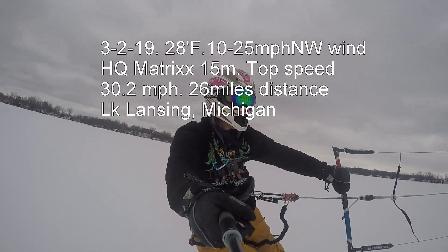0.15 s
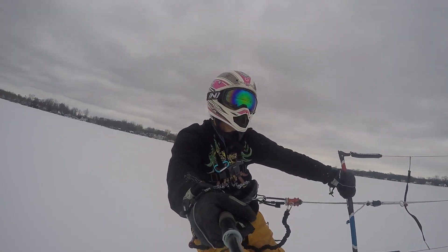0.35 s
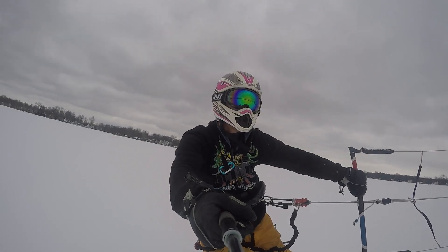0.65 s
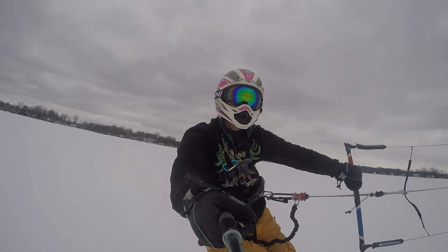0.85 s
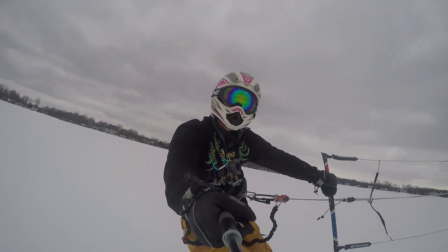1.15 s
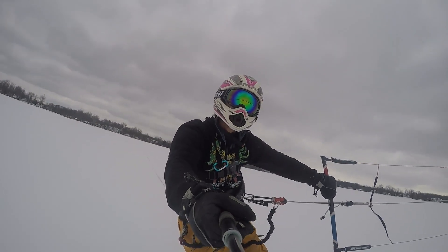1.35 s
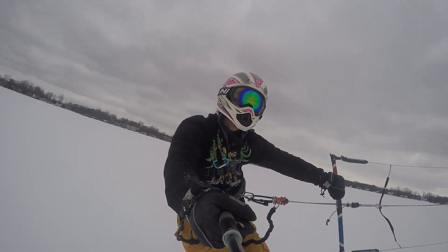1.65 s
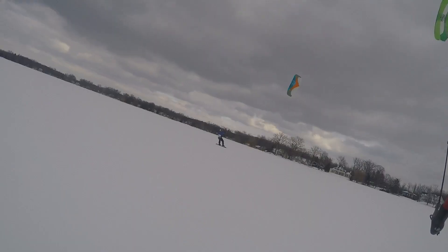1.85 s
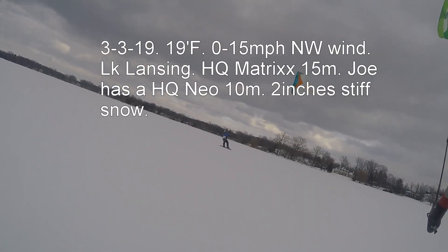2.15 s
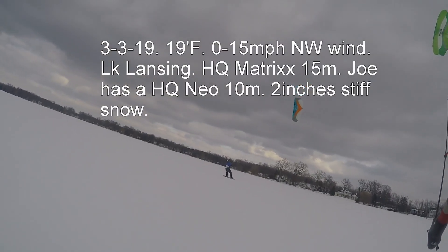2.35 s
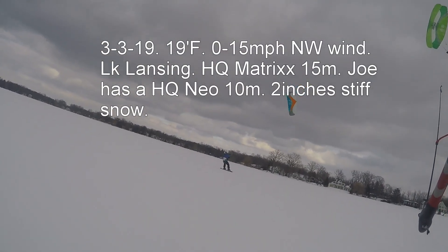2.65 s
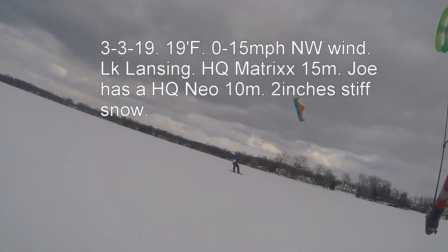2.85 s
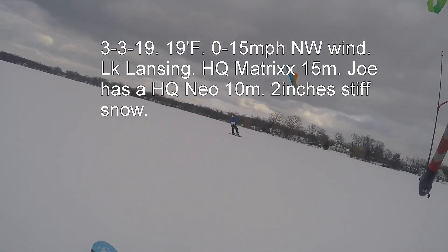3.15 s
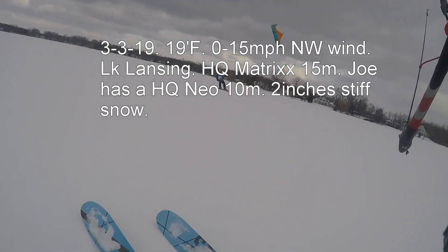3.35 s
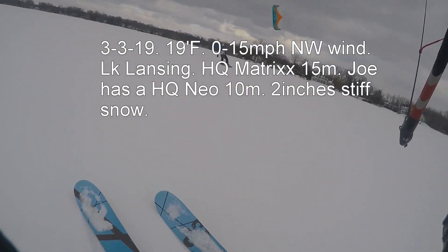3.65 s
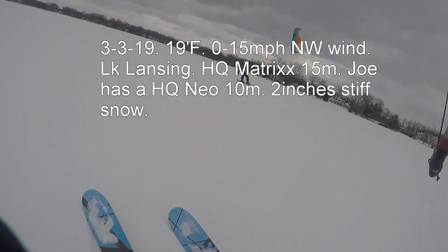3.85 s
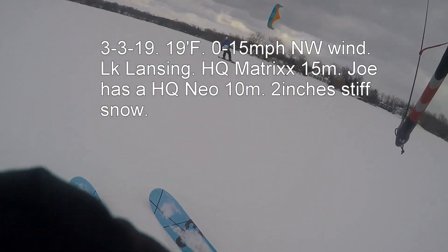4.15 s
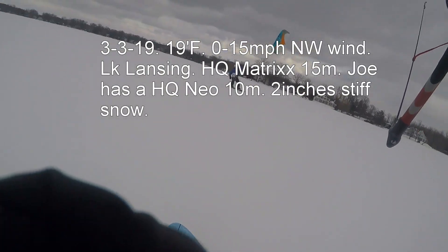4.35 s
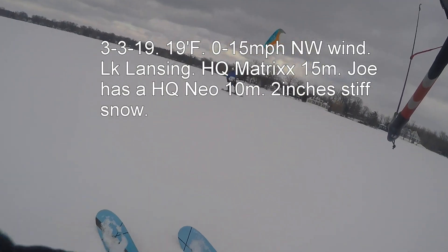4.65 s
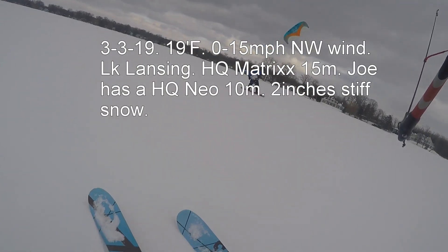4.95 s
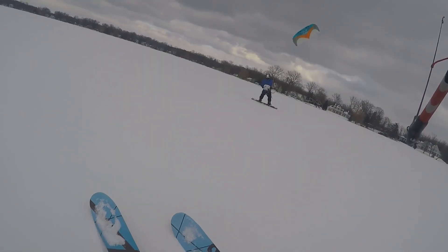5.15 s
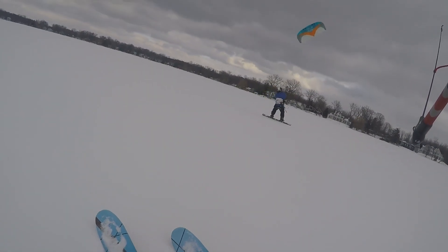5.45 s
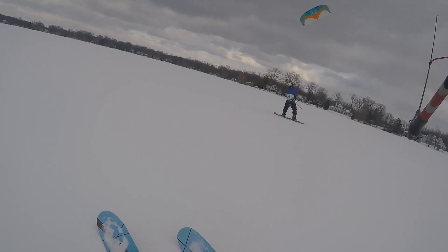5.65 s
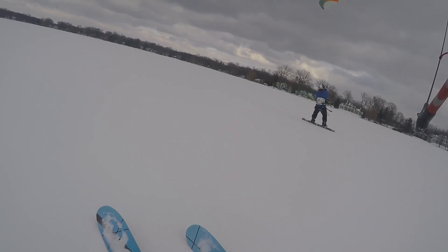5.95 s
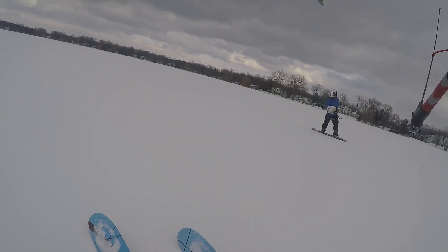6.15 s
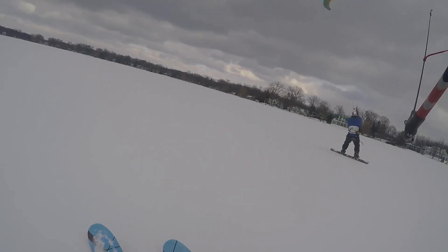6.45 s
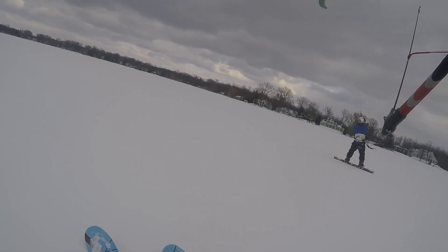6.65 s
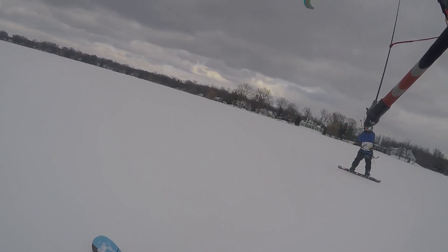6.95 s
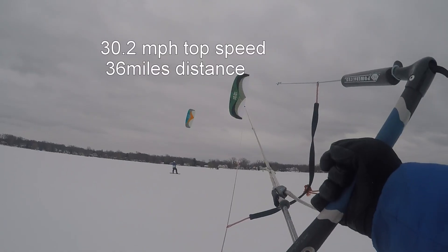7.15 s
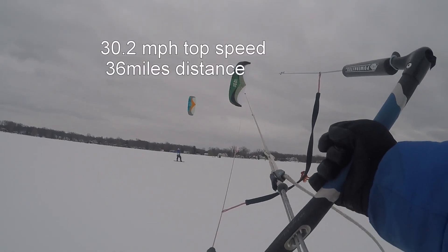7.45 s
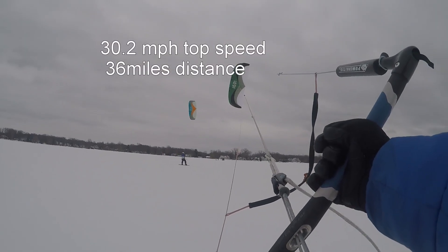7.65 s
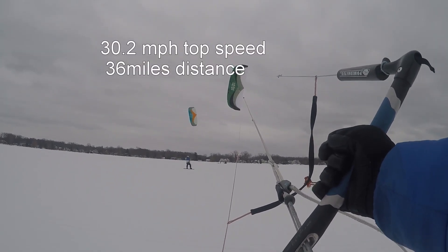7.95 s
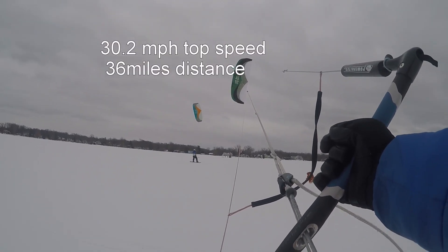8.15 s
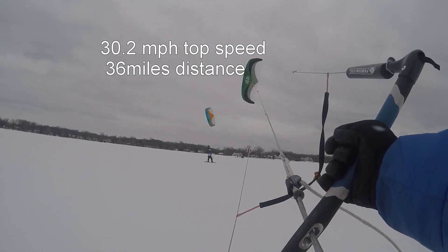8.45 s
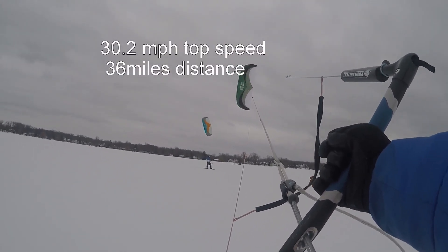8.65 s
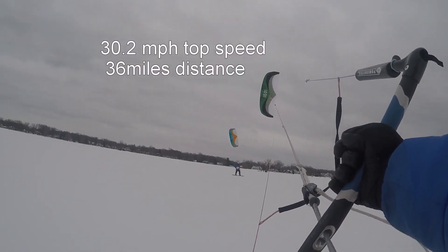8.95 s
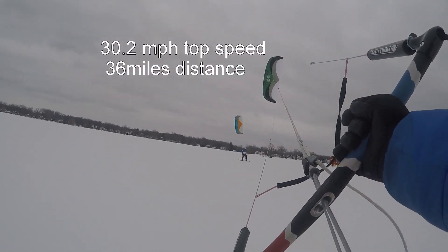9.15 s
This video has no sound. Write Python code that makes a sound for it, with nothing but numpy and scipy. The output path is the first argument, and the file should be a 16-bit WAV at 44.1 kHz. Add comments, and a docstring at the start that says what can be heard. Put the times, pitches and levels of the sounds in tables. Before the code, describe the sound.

Skis hiss faintly over stiff snow while low wind rumbles on a small camera's microphone. A grainy spray of snow, small crunches and a few light clicks fill the first second. At about 1.8 seconds a loud, close knock with a short low shudder breaks in, and the hiss and wind grow stronger. Sharp plastic clicks and dull knocks follow irregularly, loudest until 3.3 seconds, some with a brief metallic ring from a clasp. A quick rattle comes at 2.5 seconds. From about 3.2 to 4.6 seconds a glove rubs the camera in short scrapes among weaker clicks and wind buffets. Then quieter sliding and wind continue, with occasional soft knocks and a sharper one around 6.5 seconds. At about 7 seconds the hiss abruptly turns brighter and steadier, with crunchy swells and two light clicks near 9 seconds, running until about 9.3.

```python
"""On a frozen, snowy lake, a kite pulls a skier along, heard through a small camera's microphone.
The skis hiss and crunch in stiff snow while wind buffets the microphone, in three stretches that
each have their own tone. Early in the middle one, handling adds to the hiss and a glove rubs the
camera. Its plastic housing clicks, rattles and takes dull knocks, and some blows set a metal
clasp on the mount ringing."""
import sys
import numpy as np
from scipy import signal
from scipy.io import wavfile
from scipy.ndimage import uniform_filter1d

SR = 44100
rng = np.random.default_rng(int(sys.argv[2]) if len(sys.argv) > 2 else 0)


def master(y):
    """Save y as 16-bit WAV."""
    cut = np.clip(np.atleast_2d(y).T, -1, 1)
    pcm = np.round(cut * 32767)  # scale
    wavfile.write(sys.argv[1], SR, pcm.astype(np.int16))


N = 410130

# loudness of hiss and wind, one list a stretch: t/s, hiss level/dB, wind level between buffets/dB
STRETCHES = [
    [(0, -49, -41.5), (.2, -53, -51), (.4, -50.5, -44), (.9, -49, -45.5), (1.1, -51, -44.5),
     (1.25, -53.5, -47.5), (1.4, -48.5, -47.5), (1.58, -48.5, -41), (1.68, -54, -51), (1.829, -44, -47)],
    [(1.84, -30, -42), (2.01, -35, -31), (2.09, -37, -32.5), (2.17, -35.5, -37), (2.27, -45, -40.5),
     (2.45, -32, -35), (2.56, -39.5, -36), (2.63, -48.5, -41.5), (2.9, -43.5, -51.5), (3.12, -36.5, -50),
     (3.17, -42.5, -53), (3.3, -35, -32), (3.6, -41.5, -41.5), (3.86, -36, -51), (3.94, -40, -50),
     (4.05, -41, -46), (4.2, -36.5, -42), (4.26, -54, -56), (4.45, -42.5, -35.5), (4.65, -47.5, -48),
     (4.95, -45.5, -47), (5.15, -48.5, -47.5), (5.9, -48, -47.5), (6.4, -44.5, -45.5), (6.86, -41.5, -48),
     (7.07, -42.5, -47)],
    [(7.07, -41.5, -41.5), (7.5, -41, -45.5), (8.2, -40.5, -40), (8.5, -40.5, -42.5), (8.85, -39, -41.5),
     (9.3, -39.5, -41.5)],
]
# tone shared by hiss and wind, one list a stretch: f/Hz, relative level/dB
TONES = [
    [(12, -38), (20, -0.5), (80, -2), (250, -32.5), (372, -32.5), (725, -26.5), (881, -30.5), (985, -31.5),
     (2030, -22.5), (2270, -47), (2470, -19), (3080, -29), (3540, -26.5), (3960, -28.5), (6540, -41),
     (15500, -53)],
    [(12, -29), (20, 4.5), (38, 1.5), (148, -15), (667, -19.5), (1410, -29), (1770, -21), (1980, -26),
     (2840, -17), (3540, -30.5), (4430, -27), (5530, -25.5), (6360, -29), (7520, -41.5), (15500, -50.5)],
    [(12, -44), (20, -19.5), (85, 2), (161, -13.5), (686, -23.5), (788, -20.5), (1340, -27), (1770, -24),
     (2330, -13), (3170, -16), (6190, -33.5), (7310, -32.5), (8170, -32.5), (10200, -40), (15500, -42.5)],
]
# air pockets in the housing that shape that tone, one list a stretch: f/Hz, width/Hz, boost/dB
AIR_POCKETS = [
    [(734, 200, 3.5), (3250, 3500, 0), (6200, 340, -0.5), (6740, 380, 6.5), (7950, 250, 5)],
    [(1800, 280, 3.5), (2800, 860, -1.5), (4200, 320, 3), (5570, 870, -14), (6550, 460, 3),
     (7970, 290, 6.5), (14200, 640, 0.5)],
    [(1807, 200, 13.5), (2500, 1300, -1), (6840, 350, 2), (7320, 420, 8), (10150, 1200, 11.5)],
]
# one row a stretch, with the hiss at its average: fizz level/dB, rumble level/dB
FIZZ_AND_RUMBLE = [(-57, -56), (-51.5, -47.5), (-51, -47.5)]
# the skis break through crust and the hiss swells: fullest t/s, rise/dB, length/s
CRUNCHES = [(0.006, 5, .04), (.3, 4.5, .04), (5.008, 4, 0.07), (5.852, 4, 0.055), (6.06, 2.5, 0.11),
            (7.551, 4.5, .08), (7.86, 2, .05), (8.334, 4.5, 0.15), (8.566, 1.5, 0.049), (8.813, 8, 0.047),
            (8.84, 5, 0.04), (8.881, 5.5, .03), (8.954, 4, .035)]
# ice grains, one value a stretch: level/dB
GRAIN_LEVELS = [-52.5, -58, -66]
# strong jolts of low wind and handling noise: fullest t/s, level/dB, length/s
BUFFETS = [(1.916, -36, 0.091), (2.153, -22.5, 0.079), (2.425, -36, 0.075), (2.932, -29, 0.074),
           (3.094, -35, 0.31), (3.213, -42, 0.063), (3.365, -56, .12), (3.528, -32, 0.073),
           (3.624, -27.5, 0.043), (3.79, -33.5, 0.11), (3.854, -26.5, 0.13), (4.02, -37.5, 0.12),
           (4.46, -40, 0.078), (4.807, -57, 0.1), (5.01, -40.5, 0.073), (5.373, -41, .1),
           (5.891, -40, 0.062), (6.1, -48, 0.11), (6.537, -46, 0.096), (7.453, -37, 0.068),
           (7.953, -50, 0.23), (8.184, -47, 0.13)]
# a spray of snow: t/s, level/dB
SNOW_SPRAY = [(0.141, -52), (.25, -44.5), (.5, -44), (.8, -46.5), (.9, -41.5), (.95, -50), (.98, -52)]
# tones of the housing, one list for each of its four parts: f/Hz, relative level/dB, ring time/s
HOUSING_TONES = [
    [(851, -7.5, 0.031), (1168, 3, 0.021)],
    [(1768, 18.5, 0.032), (2190, 17, 0.019)],
    [(2404, 13.5, 0.019), (2690, 14, 0.021)],
    [(3490, 4.5, 0.025), (3933, 17.5, 0.01), (4540, 6.5, 0.012), (5200, -9, 0.015)],
]
# blows on the housing: t/s, nearest part's peak/dB, place round the parts (0-4), drop per part/dB,
# tick compared with that peak/dB, ring time factor
HOUSING_BLOWS = [(0.706, -36, 2, 9, -3, 0.7), (0.874, -25.5, 3.2, 3.5, 2.5, 0.4),
                 (0.904, -36, 2.5, 15.5, -16.6, 0.75), (0.96, -36, 2.3, 2.5, 1.5, 0.75),
                 (1.067, -42.4, 1.8, 5.0, 6, 0.69), (1.842, 0.5, 0.5, 3.5, -20, 0.82),
                 (1.846, -10, 0.96, 5.5, -19, 0.42), (1.878, -0.6, 3.17, 16, -23, 0.53),
                 (1.943, -23, 2.4, 1, -17, 0.75), (2.042, 0.2, 2.5, 10.5, -12.5, 0.85),
                 (2.049, -13, 1.7, 19, -29, 0.75), (2.112, -23.5, 0.72, 4.0, -15, 0.75),
                 (2.143, -2.5, 2.2, 5.5, -27, 0.33), (2.146, -5.5, 2.34, 10.0, -7, 0.64),
                 (2.154, 1.5, 2.3, 11, -21, 0.88), (2.16, -14, 3.3, 4, -8, 0.6),
                 (2.198, -10, 2.06, 5, -30, 0.56), (2.329, -4.5, 1.46, 8, -12.5, 0.71),
                 (2.385, -17, 0.44, 22, -34, 0.64), (2.435, -14.6, 1.1, 15, -29, 0.75),
                 (2.44, -16, 0.88, 7.0, -24, 0.75), (2.445, -11.5, 1.4, 7, -28, 0.75),
                 (2.469, -11.5, 1.5, 16, -26, 0.68), (2.476, -4, 1.4, 16, -28, 0.65),
                 (2.489, -7, 3, 8.5, -24, 0.46), (2.511, -3.5, 3.1, 21, -24, 0.95),
                 (2.518, -10, 2, 13, -14, 0.53), (2.868, -4, 0.93, 15, -25, 0.6),
                 (2.8685, -4, 2.73, 11, -25, 0.55), (2.926, -23.5, 0.32, 13, -17.2, 0.66),
                 (2.974, -17.5, 3.5, 11, -15, 0.38), (3.0035, 1.5, 0.98, 12.5, -28, 0.61),
                 (3.0037, -7, 2.7, 14, -22, 0.52), (3.095, -16.5, 3.6, 5, -16, 0.89),
                 (3.13, -22.5, 3.3, 7.0, -17, 0.85), (3.148, -24, 1, 1, -16, 0.39),
                 (3.162, -20.5, 2.9, 5.0, -24, 0.68), (3.265, -22.1, 0.28, 13.0, -23, 0.75),
                 (3.315, 0.7, 2.26, 6.5, -3, 0.61), (3.521, -16, 0.1, 11, -25, 0.75),
                 (3.619, -19.5, 1.94, 14, -27, 0.96), (3.643, -19.5, 0.42, 25, -30, 0.22),
                 (3.78, -19.0, 1.7, 11, -15, 0.75), (3.837, -22.5, 1.56, 10.0, -15.6, 0.96),
                 (3.857, -12, 0.76, 13, -24, 0.43), (4.003, -12, 3, 8, 3, 0.42),
                 (4.011, -21.5, 1.6, 6.5, -9, 0.86), (4.052, -25.5, 3.1, 5, -12, 0.54),
                 (4.427, -10.5, 1.1, 5.0, -19.5, 0.49), (4.549, -7.5, 1.47, 12, -16.5, 0.27),
                 (4.559, -22.4, 1.5, 4, -27, 0.8), (4.582, -26, 1.9, 13, -24, 0.68),
                 (4.941, -32.4, 2.4, 13.0, -18, 0.75), (5.251, -36, 2.4, 3, -14, 0.96),
                 (5.881, -27.5, 1.4, 5, -26, 0.47), (6.532, -30, 0.48, 9, -19, 0.84),
                 (6.564, -14.5, 1.24, 7, -34, 0.43), (8.806, -24.5, 1.6, 2.5, -18, 0.75),
                 (8.989, -27.5, 0.76, 6, -27, 0.75)]
# short scrapes, five ski crunches and then glove rubs:
# start t/s, fullest t/s, end t/s, level/dB, treble tilt/dB per octave
SCRAPES = [(.85, .875, .9, -44, 1.5), (.95, .97, .99, -46, 1.5), (1.005, 1.02, 1.045, -46, 1.5),
           (1.06, 1.075, 1.085, -48, 2.5), (1.108, 1.12, 1.15, -46, 1.5), (2.39, 2.41, 2.43, -40, -.6),
           (2.465, 2.515, 2.526, -38, 3), (3.205, 3.24, 3.33, -35, .2), (3.39, 3.42, 3.48, -40, -.6),
           (3.67, 3.71, 3.78, -40, .2), (3.94, 3.99, 4.01, -42, .2), (4.075, 4.165, 4.225, -30, 1.5),
           (4.428, 4.445, 4.55, -35, -4.5), (4.49, 4.545, 4.553, -36, .3)]
# tone of the scrapes: f/Hz, relative level/dB
SCRAPE_TONE = [(180, -26), (300, -15.5), (525, -17), (766, -12), (1140, -34), (1460, 9), (1660, -4.5),
               (3910, -5.5), (4380, -10), (6290, -6.5), (8890, -20.5), (12800, -24), (15300, -29)]
# knocks through the mount: t/s, peak level/dB, f/Hz, ring time/s
MOUNT_KNOCKS = [(1.842, -1, 490, 0.021), (2.125, -18.5, 188, 0.023), (2.383, -23.5, 704, 0.016),
                (2.434, -13.5, 333, 0.022), (2.741, -31.5, 175, 0.027), (2.922, -30, 188, 0.038),
                (3.112, -8.5, 278, 0.012), (3.186, -30, 261, 0.03), (3.249, -49, 404, 0.03),
                (3.312, -18.5, 310, 0.05), (3.512, -8, 270, 0.013), (3.619, -20.5, 670, 0.011),
                (3.765, -25.5, 338, 0.02), (3.839, -34, 183, 0.021), (4.001, -27, 188, 0.018),
                (4.148, -21.5, 750, 0.054), (4.424, -24, 209, 0.0089), (4.999, -24, 620, 0.018),
                (5.368, -26, 493, 0.014), (5.845, -35.5, 216, 0.021), (6.451, -34, 487, 0.023),
                (6.534, -29, 706, 0.045), (6.563, -15, 420, 0.0078)]
# tones of the metal clasp: f/Hz, ring time/s
CLASP_TONES = [(1852, 0.1), (2614, 0.092), (4500, 0.022), (6300, 0.028)]
# blows on the clasp: t/s, nearest tone's peak/dB, place along its tones (0-3)
CLASP_BLOWS = [(1.843, -17, 0.84), (1.88, -13.5, 2.1), (2.043, -15.5, 0.85), (2.155, -16.5, 0.99),
               (2.196, -29, .52), (2.33, -17, 0.15), (2.446, -21.5, 0.31), (2.52, -22, 0.12),
               (2.869, -21, 0.26), (3.005, -14.5, 0.12), (3.316, -22.5, .41)]
# tone of the low shudder: f/Hz, relative level/dB
SHUDDER_TONE = [(35, -53), (60, -19), (110, 0.5), (231, 4), (390, -12.5), (434, -16), (600, -9.5),
                (1500, -21.5), (1950, -50), (3300, -120)]
# how hard a loose part chatters: t/s, level/dB
CHATTER = [(2.425, -60), (2.435, -35), (2.455, -31), (2.465, -55), (2.479, -13), (2.5, -16), (2.517, -8),
           (2.526, -67)]

NOISE_TOP_HZ, MIC_TOP_HZ = 15300, 16400


def gain_of(db):
    """Turns decibels into a number to multiply a sound by."""
    return 10 ** (np.asarray(db) / 20)


def evened(x):
    """Scales a signal to an average strength (rms) of 1."""
    return x / np.sqrt(np.mean(x ** 2) + 1e-20)


def smooth(x, size):
    """Averages twice over size neighbouring samples."""
    return uniform_filter1d(uniform_filter1d(x, size), size)


def add(mix, start, sound):
    """Mixes a sound in, start seconds from the beginning."""
    part = mix[round(start * SR):][:len(sound)]
    part += sound[:len(part)]


def tone_db(table, hz):
    """Reads a tone table's level at any frequency."""
    f, db = np.transpose(table)
    return np.interp(np.log(hz + 1), np.log(f + 1), db)


def wander(t):
    """A random drift of strength about 1, made of slow waves from 1.5 to 14 Hz."""
    coarse = np.arange(t[0], t[-1] + .01, .002)
    hz = np.geomspace(1.5, 14, num=24)[:, None]
    waves = np.sin(2 * np.pi * (hz * coarse + rng.random(hz.shape))) * hz ** -.2
    return np.interp(t, coarse, evened(waves.sum(0)))


def swell(t, fullest, length):
    """A smooth rise from 0 to 1 and back."""
    return np.cos(np.pi * np.clip((t - fullest) / length, -.5, .5)) ** 2


def noise(length, tone, patchy_db, flicker_db, size):
    """Noise of strength 1 in a given tone; patches of it drift and the whole of it flickers."""
    hop = size // 4
    frames, hz = length // hop + 5, np.fft.rfftfreq(size, 1 / SR)
    real, imag, patches = rng.standard_normal((frames, len(hz), 3)).T
    patches = evened(uniform_filter1d(uniform_filter1d(patches, size=5, axis=0), size=9, axis=1))
    flicker = evened(uniform_filter1d(rng.standard_normal(frames), size=3))
    spectra = (real + 1j * imag) * gain_of(tone(hz)[:, None] + patchy_db * patches + flicker_db * flicker)
    return evened(signal.istft(spectra, nperseg=size, noverlap=size - hop)[1][:length])


def band(tone, pockets, low_hz, high_hz):
    """A soft-edged slice of a stretch's tone, shaped by the air pockets."""
    def level_db(hz):
        boost = sum(db / (1 + (2 * (hz - centre) / width) ** 2) for centre, width, db in pockets)
        edges = 10 * np.log10((1 + (low_hz / (hz + 1)) ** 8) * (1 + (hz / high_hz) ** 8))
        return tone_db(tone, hz) + boost - edges - 80 * (hz > NOISE_TOP_HZ)
    return level_db


def ring(tones, detune=1, contact_s=0.0006):
    """A struck object, peak 1: each tone fades by 60 dB over its ring time."""
    t = np.arange(6000) / SR
    sound = sum(gain_of(db - 60 * t / max(ring_s, .004)) * np.sin(2 * np.pi * hz * detune * t)
                for hz, db, ring_s in tones)
    sound *= np.sin(np.pi / 2 * np.minimum(t / contact_s, 1)) ** 2  # the blow takes time to land
    return sound / abs(sound).max()


def ski_and_handling_hiss(t, hiss_db, fizz_db, rumble_db, tone, pockets):
    """Skis on snow, plus handling early in the middle stretch; fizz and rumble partly follow along."""
    hiss_db = hiss_db + 0.88 * wander(t)
    swing_db = hiss_db - hiss_db.mean()
    crunch_db = sum(rise_db * swell(t, fullest, length) for fullest, rise_db, length in CRUNCHES)
    hiss = noise(len(t), band(tone, pockets, 1055, 4140), 1.02, 1.64, size=256)
    fizz = noise(len(t), band(tone, pockets, 4930, 18000), 0.92, 1.0, size=256)
    rumble = noise(len(t), band(tone, pockets, 125, 1360), 1.5, 2.2, size=512)
    return (gain_of(hiss_db + crunch_db) * hiss
            + gain_of(fizz_db + 0.53 * swing_db + crunch_db) * fizz
            + gain_of(rumble_db + 0.93 * swing_db) * rumble)


def ice_grains(length, per_second=40):
    """Scattered ice grains crack under the skis, a few of them large."""
    sizes = gain_of(4.3 * np.minimum(rng.exponential(1, length), 3))
    cracks = sizes * (rng.random(length) < per_second / SR)
    fade = gain_of(-60 * np.arange(600) / SR / 0.011)
    puffs = rng.standard_normal(length) * signal.oaconvolve(cracks, fade)[:length]
    return signal.sosfilt(signal.butter(2, [2200, 9000], "band", fs=SR, output="sos"), puffs)


def wind(t, wind_db, tone, pockets):
    """Air pushes on the microphone: a deep roar with sudden buffets."""
    strength = gain_of(wind_db + wander(t))
    strength += sum(gain_of(db) * swell(t, fullest, length) for fullest, db, length in BUFFETS)
    roar = noise(len(t), band(tone, pockets, 21.6, 202), 0.4, 0.48, size=2048)
    return strength * roar / np.sqrt(abs(smooth(roar ** 2, 3000)) + 0.02)  # tames the roar's own swings


def snow_spray(centre_hz=3620, width_hz=1800):
    """Snow thrown up in quick clumps: a narrow, grainy rasp, strongest at its low edge."""
    def tone(hz):
        offset = (hz - centre_hz) / width_hz
        return -10 * np.log10(1 + (2 * offset) ** 12) - 13 * offset
    times, db = np.transpose(SNOW_SPRAY)
    t = np.arange(times[0], times[-1], 1 / SR)
    return gain_of(np.interp(t, times, db)) * noise(len(t), tone, 0.99, 3.7, size=256)


def housing_clicks():
    """Each blow rings the plastic housing's parts, the nearest most, and adds a bright tick."""
    out, t = np.zeros(N), np.arange(400) / SR
    bright = signal.butter(2, [4200, 12300], "band", fs=SR, output="sos")
    tick_shape = gain_of(-60 * t / 0.0064) * np.minimum(t / 0.001, 1)
    for start, db, place, drop_db, tick_db, ring_factor in HOUSING_BLOWS:
        detunes = rng.uniform(0.901, 1.117, len(HOUSING_TONES))  # the grip shifts each part's pitch
        away = abs((np.arange(4) - place + 2) % 4 - 2)  # the last part lies next to the first
        for part, loss_db, detune in zip(HOUSING_TONES, drop_db * (away - away.min()), detunes):
            tones = [(hz, level, ring_s * ring_factor) for hz, level, ring_s in part]
            add(out, start, gain_of(db - loss_db) * ring(tones, detune))
        tick = signal.sosfilt(bright, rng.standard_normal(len(t))) * tick_shape
        add(out, start, gain_of(db + tick_db) * tick / abs(tick).max())
    return out


def scrapes():
    """Short, grainy friction: bright ski crunches near the start, then a glove rubbing the camera."""
    out = np.zeros(N)
    for start, fullest, end, db, tilt_db in SCRAPES:
        def tone(hz):
            octaves = np.log2((hz + 200) / 2000)
            return tone_db(SCRAPE_TONE, hz) + tilt_db * octaves - 80 * (hz > NOISE_TOP_HZ)
        t = np.arange(start, end, 1 / SR)
        shape = np.interp(t, [start, fullest, end], [0, 1, 0]) ** 0.43
        add(out, start, gain_of(db) * shape * noise(len(t), tone, 2.6, 1.3, size=128))
    return out


def mount_knocks():
    """Soft pushes through the mount: a low tone and two higher ones that die quickly."""
    out = np.zeros(N)
    for start, db, hz, ring_s in MOUNT_KNOCKS:
        tones = [(hz, 0, ring_s), (1.86 * hz, -7, 1.13 * ring_s), (2.82 * hz, -13, 1.09 * ring_s)]
        add(out, start, gain_of(db) * ring(tones, contact_s=0.0026))
    return out


def clasp_rings(drop_db=10.5):
    """The metal clasp rings on after a blow, loudest in the tone nearest the struck place."""
    out = np.zeros(N)
    for start, db, place in CLASP_BLOWS:
        away = abs(np.arange(len(CLASP_TONES)) - place)
        for (hz, ring_s), loss_db in zip(CLASP_TONES, drop_db * (away - away.min())):
            add(out, start, gain_of(db - loss_db) * ring([(hz, 0, ring_s)], contact_s=0.0012))
    return out


def shudder(length_s=0.16):
    """Rough, low shaking that fades faster and faster."""
    t = np.arange(0, length_s, 1 / SR)
    shake = noise(len(t), lambda hz: tone_db(SHUDDER_TONE, hz), 2.5, 0.77, size=1024)
    shake /= np.sqrt(abs(smooth(shake ** 2, 500)) + 0.072)  # evens out gaps
    level_db = -15.5 - 30.5 * (t / length_s) ** 2.95
    return gain_of(level_db) * shake * np.minimum(t / 0.0011, 1)


def rattle(per_second=4000):
    """A loose piece chatters: quick, uneven blows, each on one part of the housing."""
    times, db = np.transpose(CHATTER)
    t = np.arange(times[0], times[-1], 1 / SR)
    blows = rng.standard_normal(len(t)) * (rng.random(len(t)) < per_second / SR)
    struck = rng.integers(0, len(HOUSING_TONES), len(t))
    force = blows * gain_of(np.interp(t, times, db))
    rings = [ring(tones, contact_s=0.00088) for tones in HOUSING_TONES]
    return sum(gain_of(part_db) * signal.fftconvolve(force * (struck == part), rings[part])
               for part, part_db in enumerate([-25, -6, -2, -2.5]))


def scene():
    """All sounds reach one microphone; a faint, wavering share differs between left and right."""
    mono = housing_clicks() + scrapes() + mount_knocks() + clasp_rings()
    for rows, levels, tone, pockets, grain_db in zip(
            STRETCHES, FIZZ_AND_RUMBLE, TONES, AIR_POCKETS, GRAIN_LEVELS):
        times, hiss_db, wind_db = np.transpose(rows)
        t = np.arange(times[0], times[-1], 1 / SR)
        sound = ski_and_handling_hiss(t, np.interp(t, times, hiss_db), *levels, tone, pockets)
        sound += gain_of(grain_db) * ice_grains(len(t))
        sound += wind(t, np.interp(t, times, wind_db), tone, pockets)
        add(mono, times[0], sound * signal.windows.tukey(len(t), 200 / len(t)))  # softens both ends
    add(mono, SNOW_SPRAY[0][0], snow_spray())
    add(mono, 1.843, shudder())
    add(mono, CHATTER[0][0], rattle())
    waver = evened(smooth(rng.standard_normal(N), 150))
    side = gain_of(-31) * waver * signal.lfilter([1.3, -.7], [1], mono)
    return np.array([mono + side, mono - side])


def record(dry):
    """The hardest blows overload the input and are squashed; then the highest treble is cut."""
    squashed = dry / (1 + abs(dry) ** 6) ** (1 / 6)
    treble_cut = signal.firwin(511, MIC_TOP_HZ, window=("kaiser", 9), fs=SR)
    return signal.oaconvolve(squashed, treble_cut[None], "same")


dry = scene()
out = record(dry)
master(out)
```